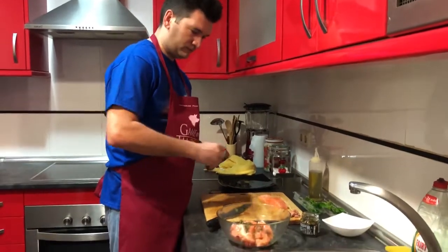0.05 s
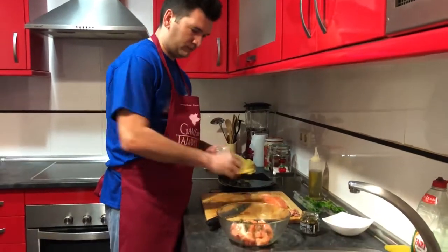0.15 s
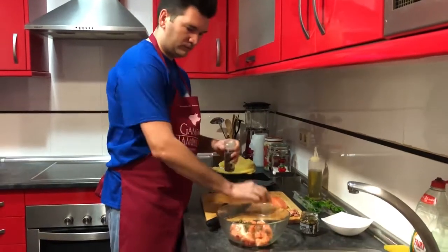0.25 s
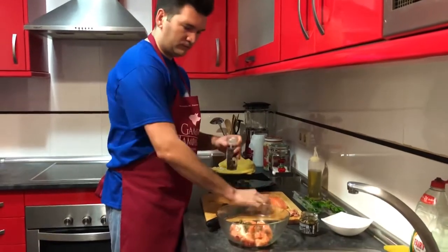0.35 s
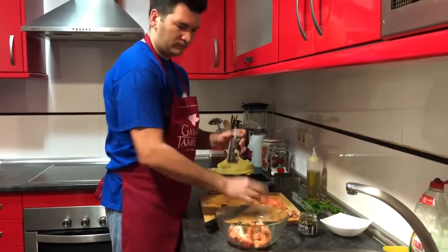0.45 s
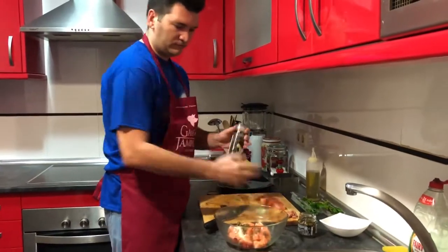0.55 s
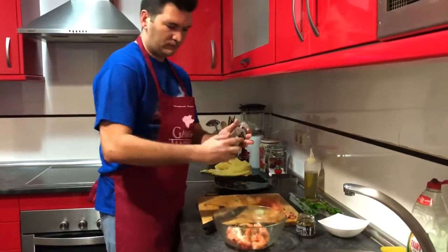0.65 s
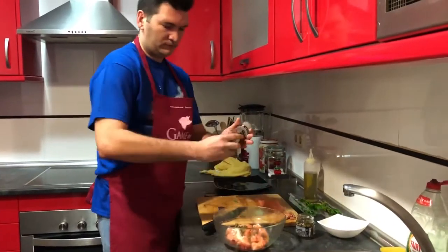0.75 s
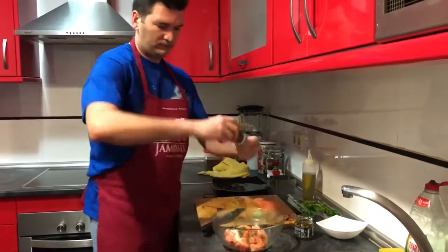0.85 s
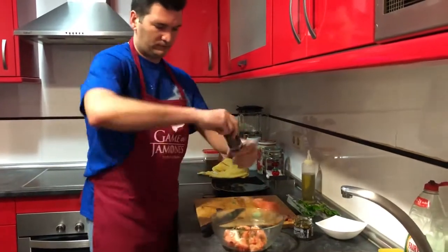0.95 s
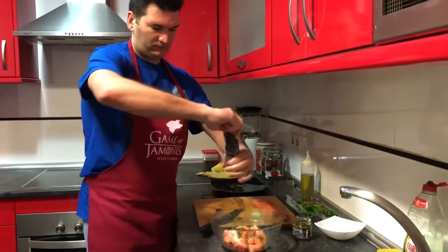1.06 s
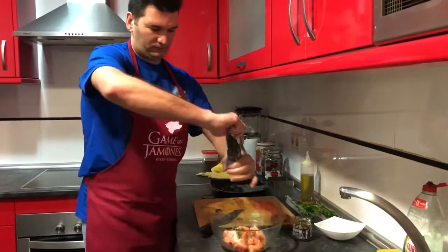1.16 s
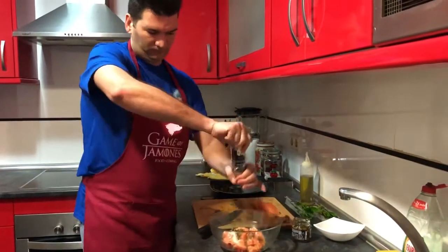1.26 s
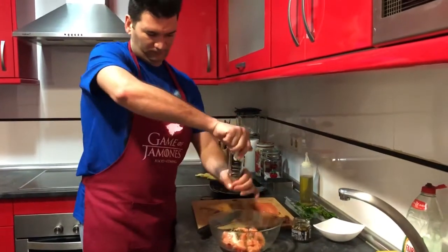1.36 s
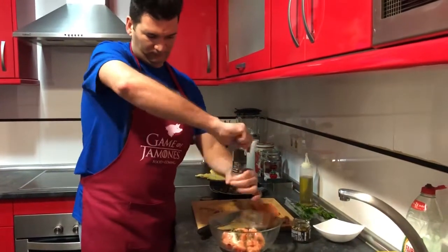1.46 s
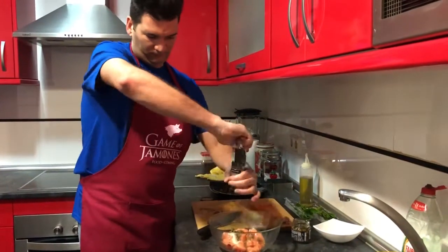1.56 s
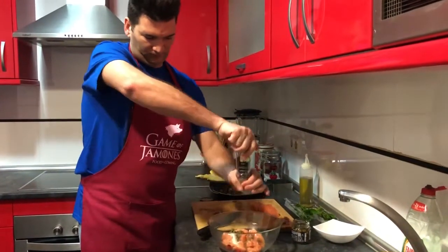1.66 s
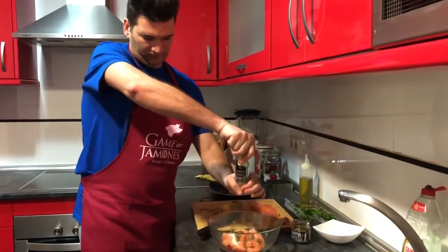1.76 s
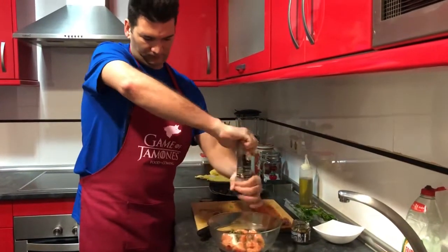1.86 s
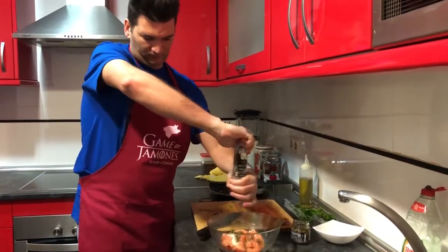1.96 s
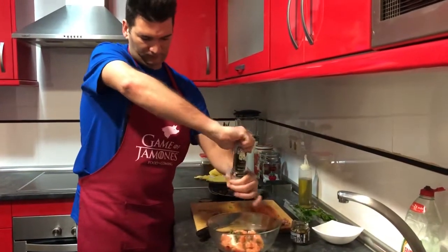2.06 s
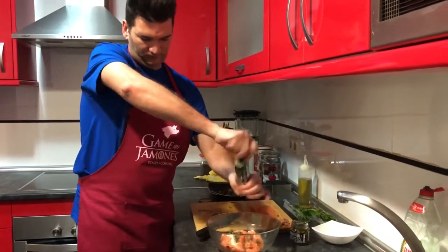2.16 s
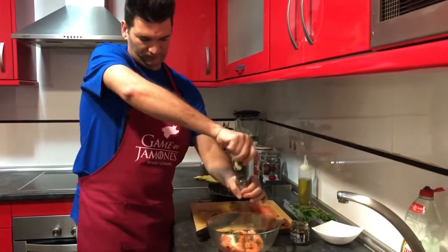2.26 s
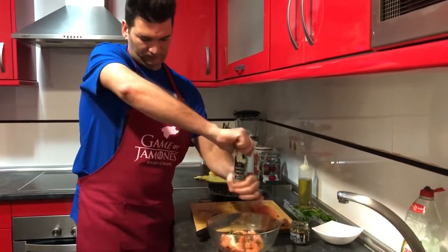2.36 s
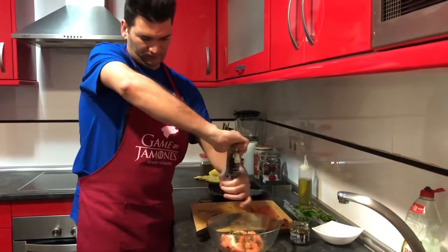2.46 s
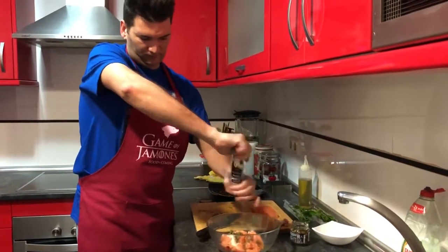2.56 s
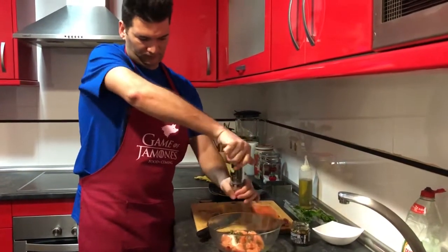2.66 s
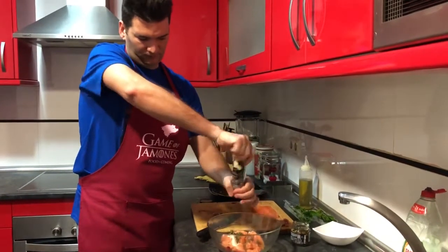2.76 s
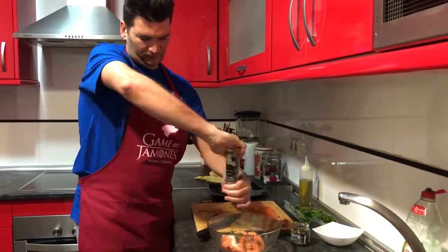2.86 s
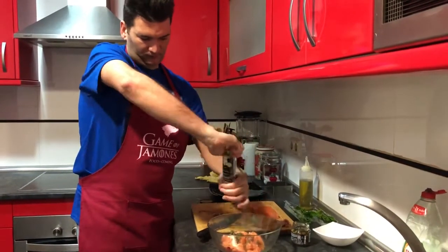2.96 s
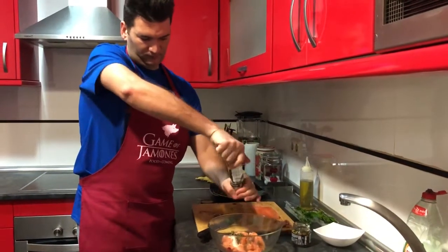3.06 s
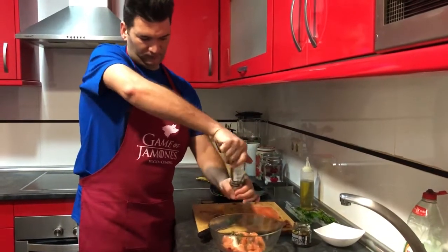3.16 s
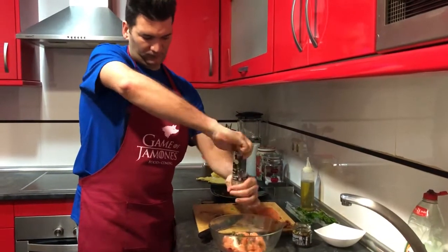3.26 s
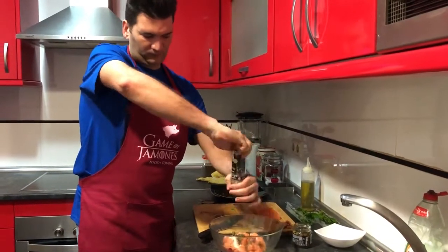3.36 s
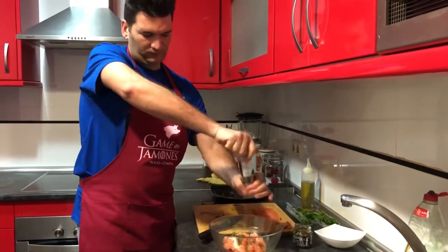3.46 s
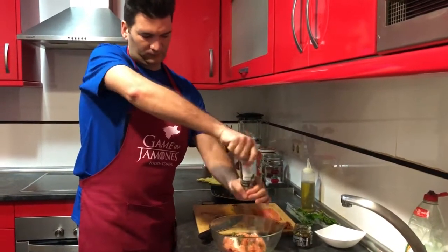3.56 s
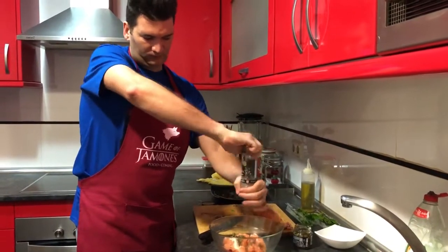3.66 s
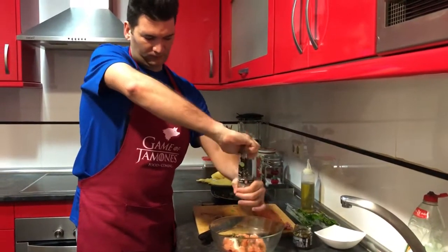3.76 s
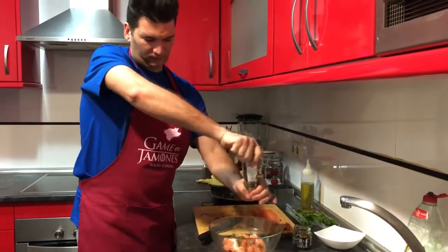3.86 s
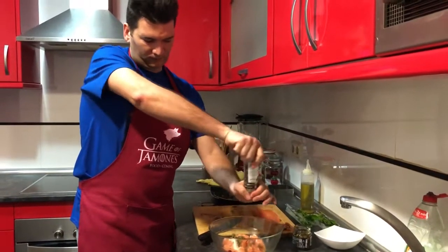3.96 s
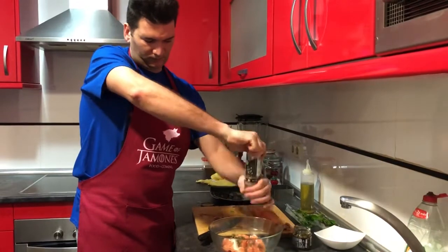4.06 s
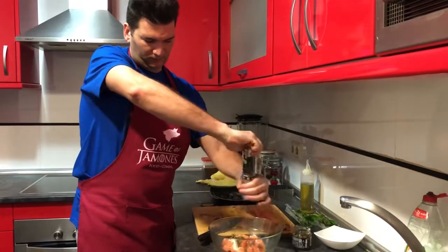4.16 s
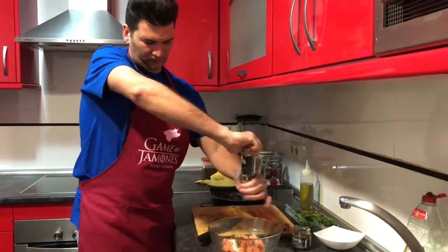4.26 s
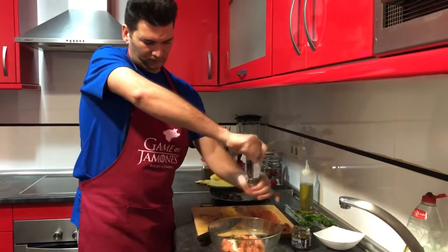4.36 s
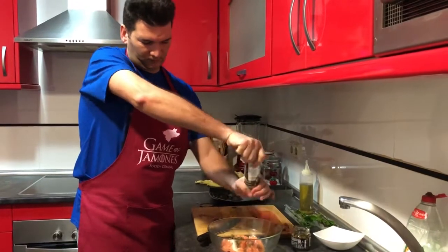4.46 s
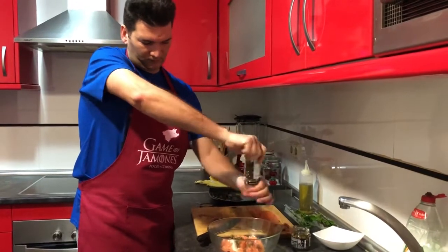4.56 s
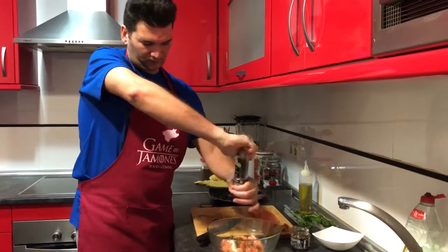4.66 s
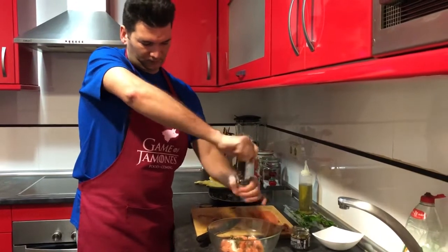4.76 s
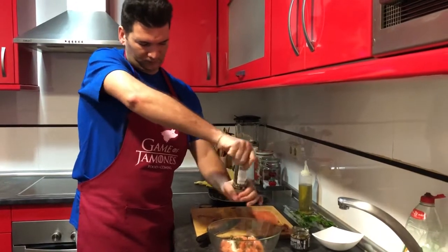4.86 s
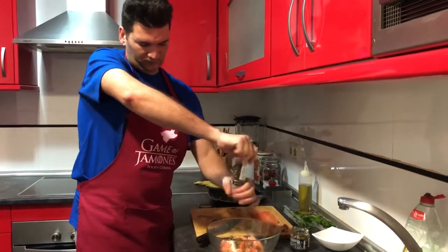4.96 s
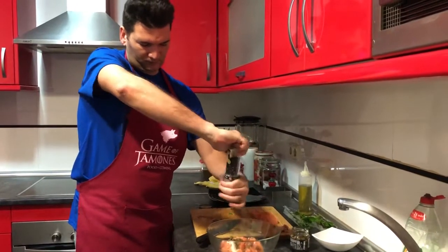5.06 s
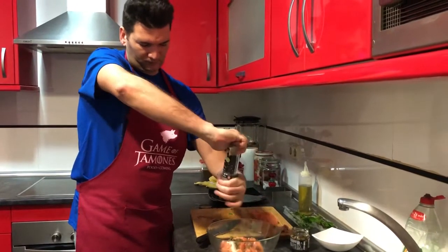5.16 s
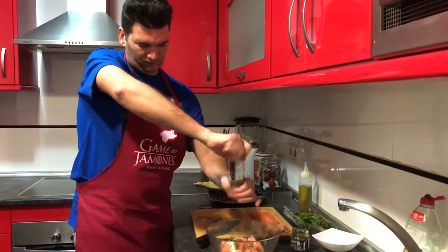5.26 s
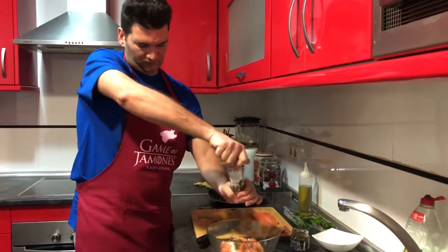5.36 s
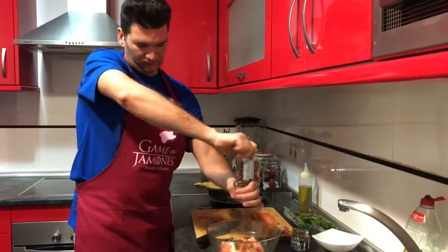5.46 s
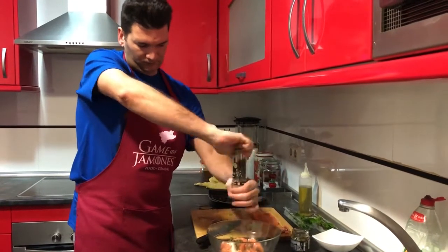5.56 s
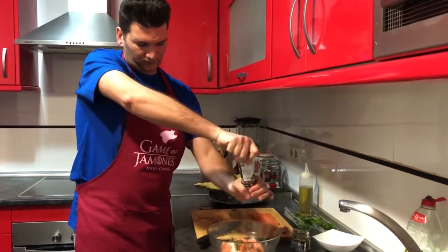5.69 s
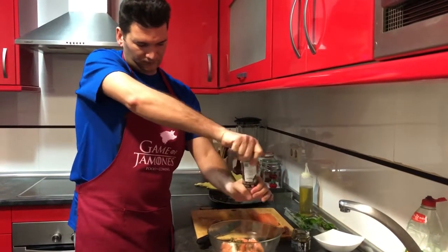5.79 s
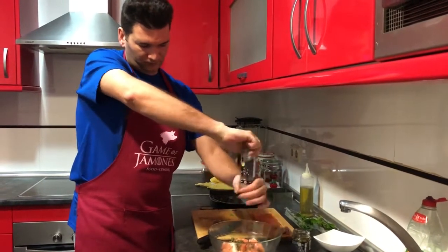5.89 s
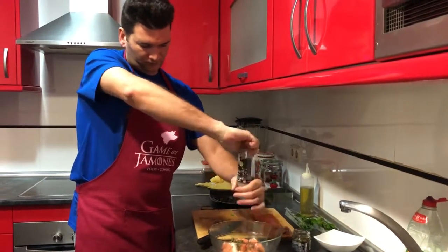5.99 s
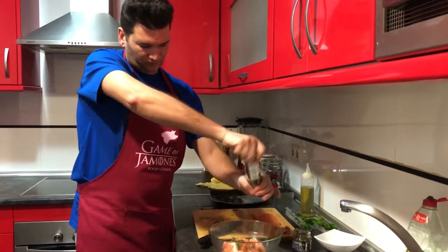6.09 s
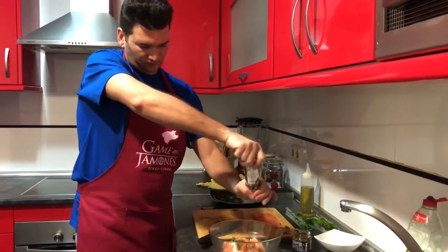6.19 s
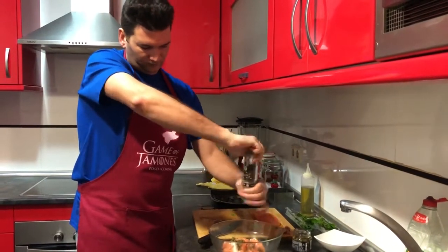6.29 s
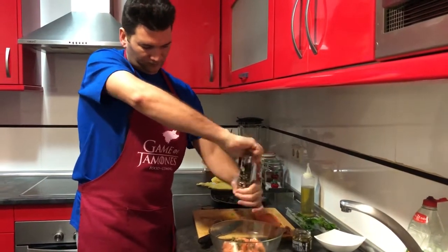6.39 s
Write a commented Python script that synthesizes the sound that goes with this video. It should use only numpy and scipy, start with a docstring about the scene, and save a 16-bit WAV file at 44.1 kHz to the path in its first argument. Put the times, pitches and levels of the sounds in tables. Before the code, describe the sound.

Short crisp grinding twists of a peppercorn mill, each with sharp cracks and a faint returning rasp, over a low kitchen hum.

```python
"""A tiled kitchen: a pepper mill's cap is set down, the mill is tipped over, then twisted back and forth.
Each twist is bursts of filtered noise for the crunch, with single loud cracks, ringing in the mill's body.
The weaker returns rasp softly with small snaps. Cap knocks and dull bumps are click volleys ringing a body.
Sparse echoes make the room; noise and sine tones make its drone, hiss and a humming kitchen appliance.
One microphone feeds the left channel, with faint crosstalk on the right."""
import sys
import numpy as np
from scipy import signal
from scipy.fft import rfft, irfft, next_fast_len
from scipy.io import wavfile

SR = 44100
rng = np.random.default_rng(int(sys.argv[2]) if len(sys.argv) > 2 else 0)


def inscribe(sig):
    """Save sig as 16-bit PCM at rate SR to the path in sys.argv[1].

    A 1-D sig is mono; a 2-D sig holds one channel per row.
    Samples are clipped to [-1, 1] before scaling.
    """
    pcm = np.round(np.clip(np.atleast_2d(sig).T, -1, 1) * 32767)
    wavfile.write(sys.argv[1], SR, pcm.astype(np.int16))


N = 283563
TIME = np.arange(N) / SR  # s
EDGE_HZ = 15900  # top of the sound's band

GRIND_PEAK_S = 0.068  # the wrist presses hardest this long into a twist
# all returns share one shape: a short, soft, hollow rasp
RETURN_PEAK_S, RETURN_LENGTH_S = 0.071, 0.148
RETURN_BUILD_DB, RETURN_HOLLOW_DB, RETURN_BRIGHT_DB = 1.5, 3, -1.4

# turns of the wrist, each a grinding twist and its return:
# (start t/s, length t/s, level/dB, build-up/dB, hollow level/dB, bright level/dB,
#  delay of the return t/s, return level/dB)
WRIST_TURNS = [(1.16, 0.066, -31, -5, 0, 1, 0.19, -46), (1.541, 0.12, -31.5, 10, -3, 0, 0.2, -50.5),
               (2.019, 0.15, -34.5, 11, -4, 0, 0.21, -49.5), (2.465, 0.16, -36, 11.5, 1.5, -2.5, 0.17, -51),
               (2.92, 0.15, -39.5, 5, -1, -0.5, 0.2, -51.5), (3.341, 0.12, -35.5, 14.5, -1, -2, 0.2, -52),
               (3.75, 0.12, -45.5, -0.5, -0.5, -0.5, 0.28, -56),
               (4.226, 0.108, -32.5, 16.5, -5, -1, 0.225, -50),
               (4.648, 0.142, -43, 10.5, 3, 1.5, 0.22, -62), (5.162, 0.14, -45.5, 2, 4, 1.5, 0.21, -50),
               (5.563, 0.13, -42, 14, 1.5, -1, 0.22, -50.5),
               (5.983, 0.19, -44.5, 4.5, 4.5, -3, 0.19, -47.5)]
# handling before the first turn: a scrape, a rustle, corns sliding twice as the mill tips over
# (start t/s, time to the peak t/s, length t/s, level/dB, build-up/dB, hollow level/dB, bright level/dB)
HANDLING_STROKES = [(0, 0.0033, 0.046, -49, -29, 7, -14.5), (0.46, 0.08, 1, -69.5, -6, 5, -3.5),
                    (0.919, 0.039, 0.095, -45.5, 10, -2.5, 6), (1.087, 0.004, 0.025, -44.5, 6, -0.5, -8)]


def strokes():
    """Every rubbing movement, in the columns of HANDLING_STROKES: handling, then each twist and its return."""
    rows = list(HANDLING_STROKES)
    for start, length, db, build_db, hollow_db, bright_db, delay, return_db in WRIST_TURNS:
        rows.append((start, GRIND_PEAK_S, length, db, build_db, hollow_db, bright_db))
        rows.append((start + delay, RETURN_PEAK_S, RETURN_LENGTH_S, return_db,
                     RETURN_BUILD_DB, RETURN_HOLLOW_DB, RETURN_BRIGHT_DB))
    return rows


def load_db(t, peak_s, length, db, build_db, fade_db=9):
    """The load moves by the build-up to the level at the peak, then eases off towards the end."""
    return np.interp(t, [0, peak_s, max(length, peak_s)], [db - build_db, db, db - fade_db])


def crunch(edge_s=0.0036, grains_per_s=600, splinter_s=0.00068, groan_db=3):
    """The burrs crumble husks into grit, as loudly as the load presses them."""
    out = np.zeros(N)
    # every fragment splinters for a moment, so the grit comes in tiny bursts over a little dust
    fragment_energy = fractures(N, grains_per_s, spread_db=3.5) ** 2
    bursts = signal.lfilter([1], [1, -np.exp(-1 / (splinter_s * SR))], fragment_energy)
    dust = 0.25
    grit = (np.sqrt(bursts / bursts.mean()) + dust) * rng.standard_normal(N)
    for start, peak_s, length, db, build_db, hollow_db, bright_db in strokes():
        span = slice(max(round(start * SR), 0), round((start + length) * SR))
        t = TIME[span] - start
        edges = np.clip(np.minimum(t, length - t) / edge_s, 0, 1)
        load = amp(load_db(t, peak_s, length, db, build_db)) * edges
        rasp = evened(grit[span] * load) * np.sqrt(np.mean(load ** 2))
        add(out, start, tinted(rasp, hollow_db, bright_db))
    # steady grinding shakes the whole housing more than a quick crack does
    return coloured(out, [(800, 0), (1350, groan_db), (2000, 0)])


# small pieces of husk snap under the burrs, louder as the load grows
CHIPS_PER_S, CHIPS_OVER_LOAD_DB, CHIPS_SPREAD_DB = 22, -3, 2.5


def chips(count=8):
    """Small cracks, one at random in each slot from the start of a stroke, in the columns of PEPPER_CRACKS."""
    rows = []
    for start, peak_s, length, db, build_db, hollow_db, bright_db in strokes():
        moments = (np.arange(count) + rng.random(count)) / CHIPS_PER_S
        levels = load_db(moments, peak_s, length, db, build_db) + CHIPS_OVER_LOAD_DB
        levels += CHIPS_SPREAD_DB * rng.standard_normal(count)
        for t, level in zip(moments, levels):
            if t < length:
                rows.append((start + t, level, hollow_db, bright_db))
    return rows


# the clearest peppercorns cracking or striking the mill:
# (t/s, level/dB, hollow level/dB near 2 kHz, bright level/dB near 10 kHz)
PEPPER_CRACKS = [(0.5255, -54, -2, 4), (0.9212, -47.5, 0, 2), (1.122, -25.5, -7, -7.5),
                 (1.1636, -23, -5.5, -6), (1.167, -17, -24, 1.5), (1.1834, -19.5, -3, 7.5),
                 (1.2451, -26.5, 5.5, 7), (1.2595, -21.5, 5, 8), (1.3599, -24, -18, -14),
                 (1.3952, -27.5, -9, 2.5), (1.4793, -32, -1, -8), (1.543, -25, -5, 1), (1.5826, -28, -1, 7),
                 (1.624, -17.5, -1.5, 1), (1.6306, -24.5, 1.5, 0), (1.8142, -34, -9, -2),
                 (2.0233, -35, -10, -3), (2.0427, -23.5, -2.5, -5), (2.0617, -24.5, -10, 1),
                 (2.132, -34.5, 6.5, 7.5), (2.2586, -30.5, -13, -4), (2.3238, -33.5, -8, 6),
                 (2.4906, -24.5, -33, -6), (2.551, -27, 8, -14), (2.5825, -17.5, 1, -1),
                 (2.753, -35.5, -1, 6.5), (2.921, -38, 2, -10), (2.9362, -30.5, -4, 2.5),
                 (3.1639, -36.5, -2, -4), (3.3667, -32, -9, -7), (3.3885, -26, -19, -1),
                 (3.5979, -39.5, 2, 5), (3.7804, -24, -28, -2), (3.8405, -26, 1.5, 4),
                 (4.2611, -28, -11, -4), (4.278, -24, -2, -2), (4.3004, -17.5, 7, 1),
                 (4.5288, -38.5, 7, 0.5), (4.6971, -29, -8, 5.5), (4.7214, -30.5, -6, 1),
                 (4.8968, -44.5, 1, -10), (4.9674, -33.5, 1, -2.5), (5.2446, -28, -4.5, -15),
                 (5.257, -29.5, -1, 0), (5.6076, -30, -7.5, -6), (5.8565, -33, -4, -3.5),
                 (6.047, -30, -3.5, -6), (6.0847, -29.5, -1, -1), (6.227, -39.5, -2, 2.5),
                 (6.3702, -45, 1.5, 2)]


def cracks():
    """Peppercorns and pieces of husk give way one at a time, each a short volley of clicks."""
    out = np.zeros(N)
    for s, db, hollow_db, bright_db in PEPPER_CRACKS + chips():
        crack = snap(decay_s=0.0029)
        add(out, s, amp(db) * tinted(crack, hollow_db, bright_db))
    return out


# broad colour of the mill: (f/Hz, level/dB)
MILL_TONE = [(150, -24), (500, -23), (950, -23), (1280, -12.5), (1650, -4), (2600, -2.5), (4000, 1.5),
             (5500, -3), (8500, -2.5), (12500, -4), (15800, -7.5)]
# resonances of the mill's body and burrs: (f/Hz, width f/Hz, lift level/dB)
MILL_RESONANCES = [(1894, 36, 6.5), (2094, 7.3, 9.5), (2650, 155, 5), (4380, 310, 2), (5300, 40, -3.5),
                   (6020, 65, 2), (7160, 113, 8), (7630, 110, 2), (11100, 100, -4.5)]


def mill():
    """Crunch and cracks ring in the same body."""
    return signal.oaconvolve(crunch() + cracks(), body(MILL_TONE, MILL_RESONANCES))[:N]


# the cap lands and chatters: (t/s, level/dB)
CAP_CONTACTS = [(0.312, -26), (0.3158, -29.5), (0.3198, -53), (0.4245, -52)]
# colour of the cap's contact click: (f/Hz, level/dB)
CAP_TONE = [(150, -21), (800, -5.5), (1500, -11), (2400, 3), (3200, 7), (4400, -14), (5000, -1),
            (6500, 1.5), (7400, -10.5), (8500, -3), (11000, -7.5), (15800, -17)]
# resonances of the cap: (f/Hz, width f/Hz, lift level/dB)
CAP_RESONANCES = [(840, 82, 15), (2896, 290, 10), (3070, 250, 7), (3440, 120, 2), (4820, 240, 11.5)]


def cap():
    """Brief hard contacts set the cap's resonances ringing."""
    return knocks(CAP_CONTACTS, body(CAP_TONE, CAP_RESONANCES), decay_s=0.0022)


JOLT_DB = -12.5  # each twist also jolts the mill in the hands, relative to the twist's level
# dull bumps as the cap is let go and the mill is gripped: (t/s, level/dB)
HAND_BUMPS = [(0.33, -43), (0.44, -44.5), (0.525, -47)]
# colour of the bumps and jolts: (f/Hz, level/dB)
BUMP_TONE = [(80, -17), (200, -2.5), (500, 3), (850, 2), (1400, 4), (2200, -3.5), (5000, -39)]


def bumps():
    """Longer contacts with a dull colour: handling bumps, and a jolt at each twist's peak time."""
    jolts = [(start + GRIND_PEAK_S, db + JOLT_DB) for start, _, db, *_ in WRIST_TURNS]
    return knocks(HAND_BUMPS + jolts, body(BUMP_TONE), decay_s=0.02)


# reverberation of the kitchen, time to fall 60 dB: (f/Hz, decay t/s)
KITCHEN_DECAY = [(300, 0.65), (900, 0.57), (2100, 0.49), (4500, 0.44), (8000, 0.35), (15000, 0.22)]


def room_response(first_s=0.0025, early_db=3, early_s=0.015):
    """Sparse reflections, stronger early from the worktop and tiles, each band dying at its own speed."""
    count = SR * 3 // 4
    t = TIME[:count]
    hits = rng.random(count) < 4000 / SR  # 4000 reflections per second
    taps = hits * rng.choice([-1., 1.], count) * (t > first_s)
    taps = taps * amp(early_db * np.exp(-t / early_s))
    hz, frame_s, bands = signal.stft(taps, SR, nperseg=256)
    decay = amp(-60 * frame_s / read(KITCHEN_DECAY, hz)[:, None])
    tail = signal.istft(bands * decay, SR, nperseg=256)[1]
    return tail / np.linalg.norm(tail)


def kitchen(x, count=7, size=650):
    """Each grain sends its sound a different way, so successive moments crossfade between echo patterns."""
    wet = np.zeros(N)
    for k in range(count):
        turn = (np.arange(N) / size - k) % count  # size is in samples
        share = np.sin(np.pi / 2 * turn) * (turn < 2)
        wet += signal.oaconvolve(x * share, room_response())[:N]
    return x + wet


DRONE_DB, HISS_DB = -57, -62.5  # rms
# colour of the kitchen's low drone: (f/Hz, relative level/dB per Hz)
DRONE_TONE = [(20, -34), (32, -30), (40, -10), (48, -0.5), (64, 3.5), (88, -3.5), (125, -4.5), (185, -4.5),
              (260, -2), (330, -10.5), (520, -11.5), (700, -17), (1100, -36.5)]
# colour of the faint hiss above it: (f/Hz, relative level/dB per Hz)
HISS_TONE = [(500, -4), (800, 5), (1400, 2.5), (2500, -7), (4500, -11.5), (6000, -13.5), (9000, -21),
             (13000, -32), (15800, -23)]
# steady appliance tones: (f/Hz, rms level/dB)
HUM_TONES = [(75.4, -88), (100, -67), (152, -66), (600.5, -70), (5080, -82.5)]


def background(waver=0.57):
    """Air drone and hiss from shaped noise, under motor tones whose phase wavers slightly (radians)."""
    out = amp(DRONE_DB) * evened(coloured(rng.standard_normal(N), DRONE_TONE))
    out += amp(HISS_DB) * evened(coloured(rng.standard_normal(N), HISS_TONE))
    for hz, db in HUM_TONES:
        drift = np.interp(TIME, np.linspace(0, TIME[-1], 40), rng.standard_normal(40))
        out += amp(db) * np.sqrt(2) * np.sin(2 * np.pi * hz * TIME + waver * drift)
    return out


def knocks(rows, response, decay_s):
    """Contacts (t/s, level/dB) that ring one object."""
    out = np.zeros(N)
    for s, db in rows:
        add(out, s, amp(db) * signal.fftconvolve(snap(decay_s), response))
    return out


def snap(decay_s, rise_s=0.00044, count=1100):
    """A fracture or hard contact: a volley of clicks that swells and dies, nearly even across frequency."""
    volley = rng.standard_normal(count) * np.exp(-TIME[:count] / decay_s)
    # flatten the spectrum, trim to length, repeat
    for _ in range(4):
        phase = np.angle(rfft(volley, 2 * count))
        volley = irfft(np.exp(1j * phase))[:count]
    volley *= 1 - np.exp(-TIME[:count] / rise_s)
    # as much energy as 2.5 ms at rms 1
    return volley / np.linalg.norm(volley) * np.sqrt(0.0025 * SR)


def fractures(count, per_s, spread_db):
    """Tiny clicks at random moments, most small and a few large, rms 1."""
    chance, size, sign = rng.random((3, count))
    size_db = spread_db * np.minimum(-np.log(size + 1e-9), 4)
    return evened((chance < per_s / SR) * amp(size_db) * np.sign(sign - 0.5))


def tinted(x, hollow_db, bright_db, ripple_db=2.0, count=48):
    """Coarse pieces sound hollow, fine ones bright; every spot on the burrs adds a colour of its own."""
    ripple = ripple_db * rng.standard_normal(count)
    spot = np.transpose([np.geomspace(1500, EDGE_HZ, count), ripple])
    rippled = evened(coloured(x, spot)) * np.sqrt(np.mean(x ** 2))
    tint = [(1250, 0), (1900, hollow_db), (2900, hollow_db), (3600, 0), (5400, 0), (7500, bright_db)]
    return coloured(rippled, tint)


def body(colour, modes=(), size=4096):
    """Causal (minimum-phase) impulse response of an object: a broad colour lifted by resonances."""
    hz = abs(np.fft.fftfreq(size, 1 / SR))
    db = read(colour, hz)
    for f, width, lift in modes:
        db = db + lift / (1 + (2 * (hz - f) / width) ** 2)
    gain = amp(db) / np.sqrt(np.mean(amp(db) ** 2 * (hz < EDGE_HZ)))  # energy 1 within the band
    spectrum = np.exp(np.conj(signal.hilbert(np.log(gain))))
    return np.fft.ifft(spectrum).real[:size // 2]


def coloured(x, points):
    """Filters x by a (f/Hz, level/dB) table."""
    size = next_fast_len(len(x) + 256)
    gain = amp(read(points, np.fft.rfftfreq(size, 1 / SR)))
    return irfft(rfft(x, size) * gain, size)[:len(x)]


def read(points, hz):
    """Reads a (f/Hz, value) table on a log-frequency axis."""
    f, value = np.transpose(points)
    return np.interp(np.log(hz + 1), np.log(f + 1), value)


def amp(db):
    """Decibels to gain."""
    return 10 ** (np.asarray(db) / 20)


def evened(x):
    """Scales to rms 1."""
    return x / np.sqrt(np.mean(x ** 2) + 1e-20)


def add(mix, s, sound):
    """Mixes a sound in at time s."""
    part = mix[max(round(s * SR), 0):][:len(sound)]
    part += sound[:len(part)]


RIGHT_DB = -76  # faint crosstalk into the right channel


def scene():
    """Everything reaches one microphone on the left channel."""
    mic = kitchen(mill() + cap() + bumps()) + background()
    return np.array([mic, amp(RIGHT_DB) * mic])


def record(dry):
    """Limits the band with a steep low-pass at EDGE_HZ."""
    low_pass = signal.firwin(511, EDGE_HZ, window=("kaiser", 9), fs=SR)
    return signal.oaconvolve(dry, low_pass[None], "same")


dry = scene()
out = record(dry)
inscribe(out)
```